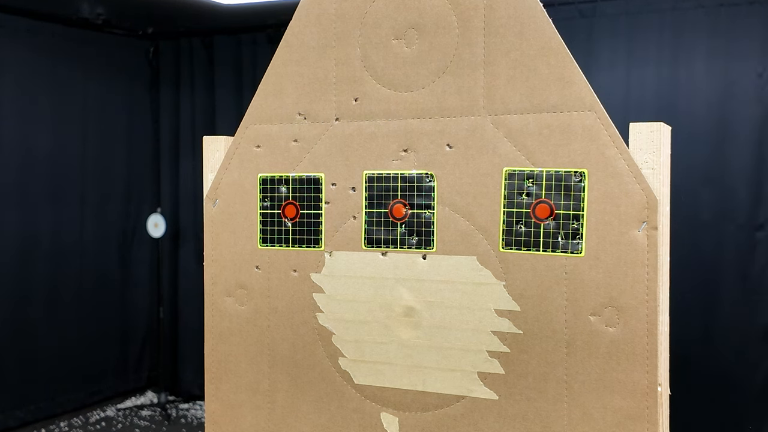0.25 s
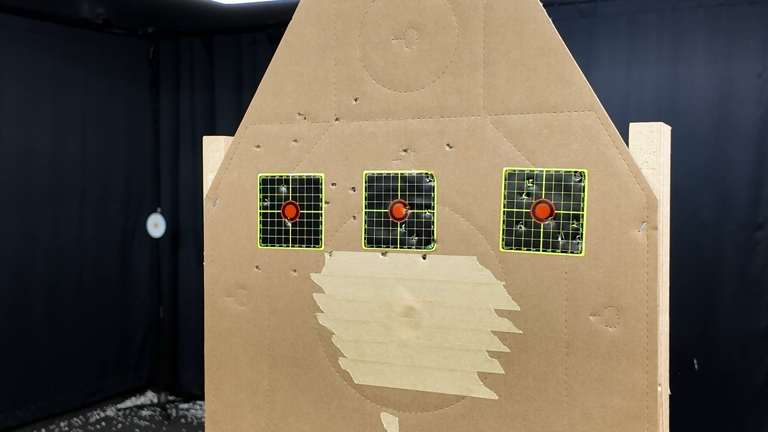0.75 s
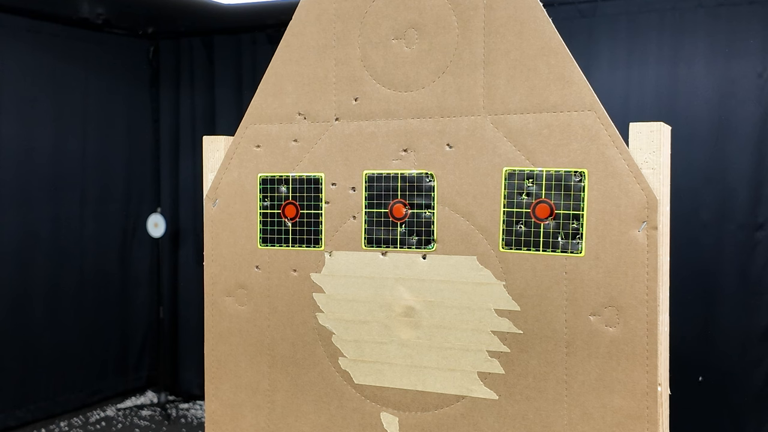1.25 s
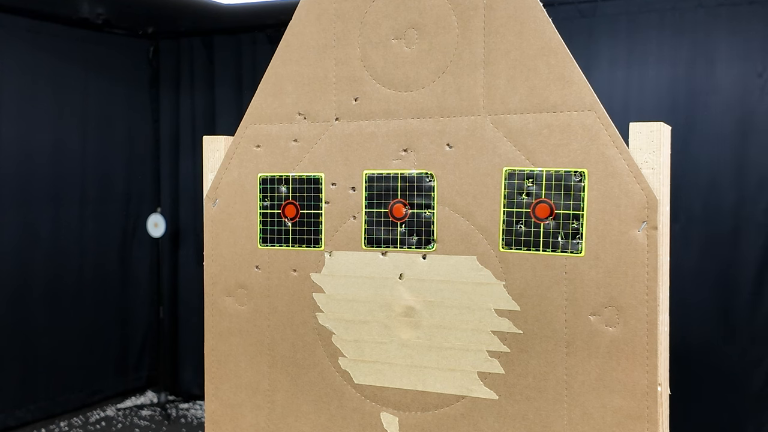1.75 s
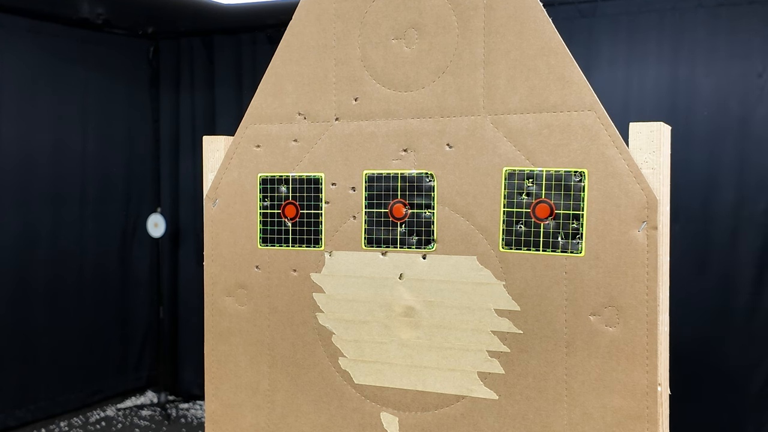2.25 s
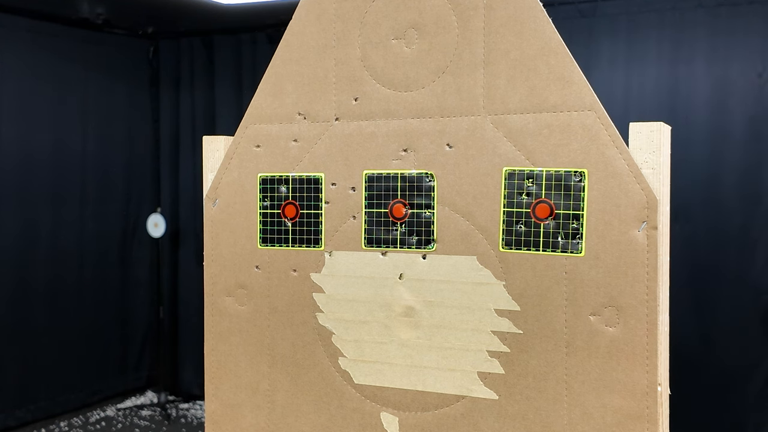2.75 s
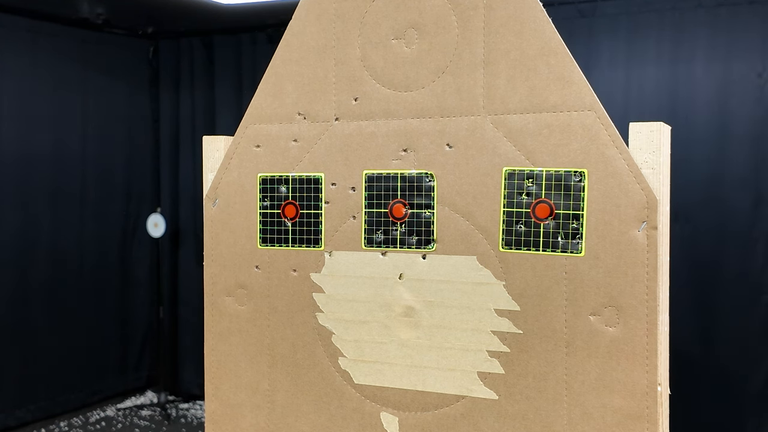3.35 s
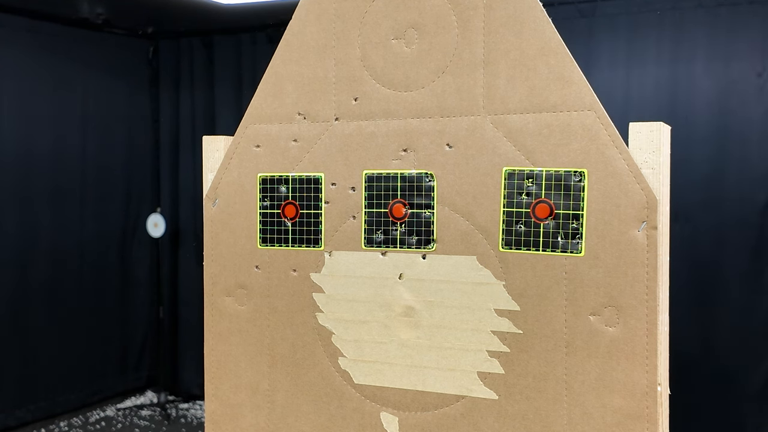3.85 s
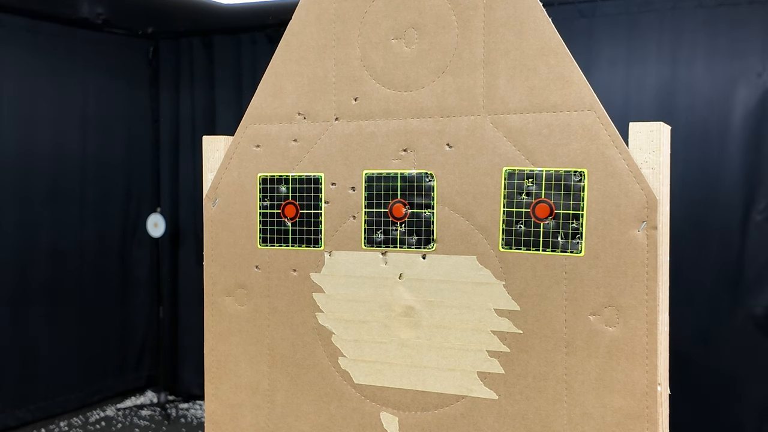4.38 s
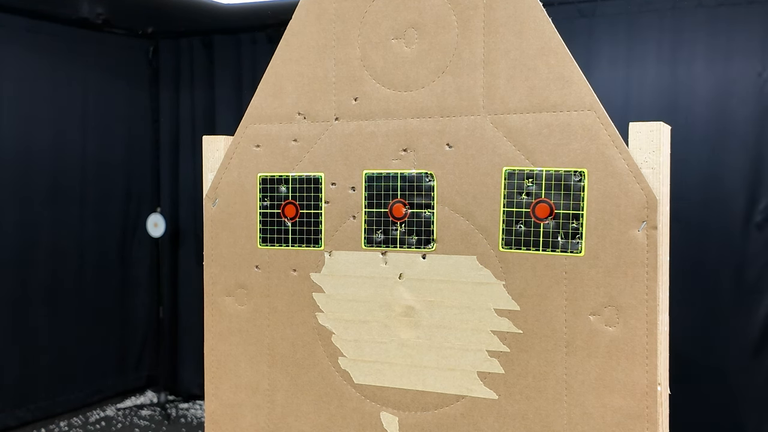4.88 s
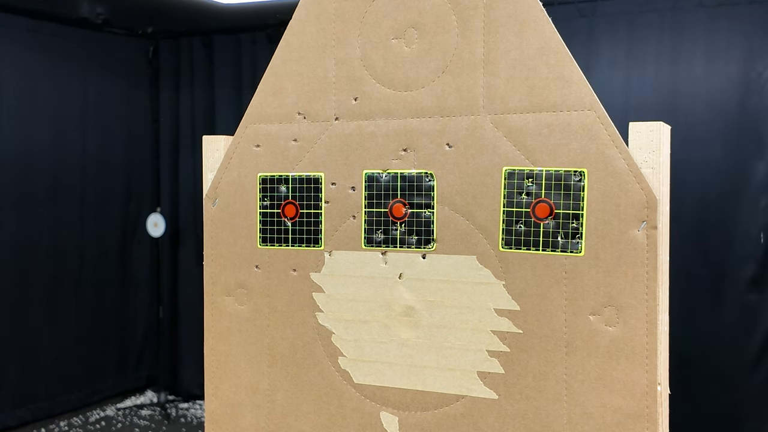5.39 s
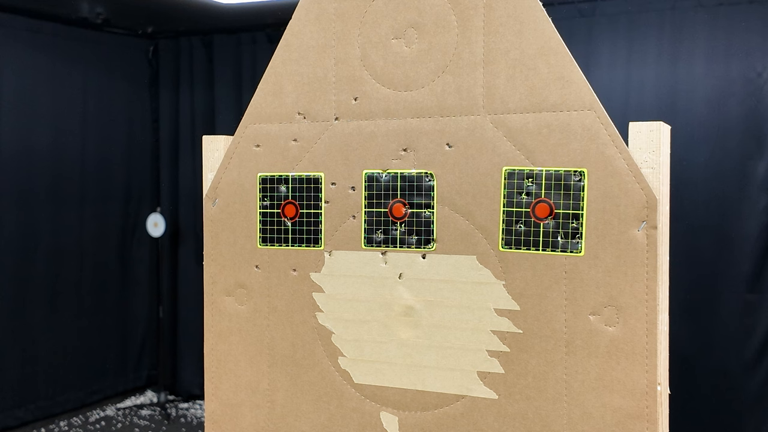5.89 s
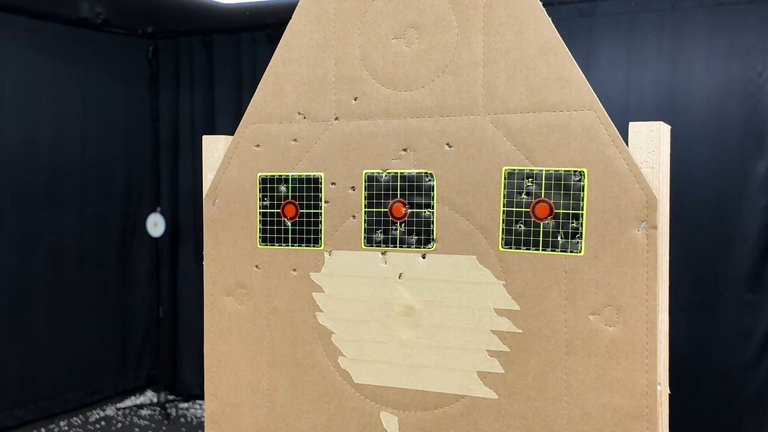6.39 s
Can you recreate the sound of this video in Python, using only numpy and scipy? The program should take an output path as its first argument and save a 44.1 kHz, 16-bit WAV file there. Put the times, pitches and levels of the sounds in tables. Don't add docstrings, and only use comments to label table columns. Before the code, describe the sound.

Right beside the microphone, a gas blowback air pistol fires six times, just under a second apart. Each shot is a sharp, overloaded crack with metallic slide clatter, then a pellet smacks cardboard a tenth of a second later. Dry trigger clicks fall between shots. After the last, the slide stays open, a catch clicks and a sleeve rustles. A small curtained room gives a short tail over low ventilation rumble.

```python
import sys
import numpy as np
from scipy import signal
from scipy.fft import rfft, irfft, next_fast_len
from scipy.io import wavfile
from scipy.ndimage import uniform_filter1d

SR = 44100
rng = np.random.default_rng(int(sys.argv[2]) if len(sys.argv) > 2 else 0)


def voltage_ratio(level):
    return 10 ** (np.asarray(level, float) / 20)


def dump(signal):
    limited = np.clip(np.atleast_2d(signal).T, -1, 1)
    pcm = np.round(limited * 32767).astype(np.int16)
    wavfile.write(sys.argv[1], SR, pcm)


N = 292383

# blast time in seconds, slide-back level in dB, time until the slide stops in ms.
SHOTS = [
    (.4440, -1, 52.2),
    (1.4028, -1, 52.7),
    (2.3134, 2, 52.6),
    (3.2039, 3, 53.2),
    (4.1411, 3, 52.6),
    (4.9793, 2, 31.2),
]
# peak in dB, rattle in ms.
TRAVEL = [(-13.5, 27), (-7.5, 2.3), (9.5, 1.4), (2.5, 2.6), (-7, 9), (-15, 4.1)]
TRAVEL_MS = [-5.0, -3.0, 1.5, 7.0, 14.5, 38]
# level in dB, rattle in ms.
SLAM = [
    (-3, 3),
    (2, 2.8),
    (-8.5, 1.8),
]
SLAM_MS = [0, 2.6, 7]
# frequency in Hz, width in Hz, level in dB.
BARREL = [(1053, 310, -1.5), (1846, 150, -4), (2330, 220, 4.5), (3130, 380, 0), (5450, 910, -14.5),
          (7770, 890, -16), (10700, 760, -20), (13300, 700, -44)]
# frequency in Hz, width in Hz, level in dB.
MUZZLE = [(430, 300, 0), (690, 300, -4), (1500, 700, -17), (2500, 700, -20), (6000, 2000, -31)]
# frequency in Hz, width in Hz, level in dB.
SLIDE = [(432, 92, -14.5), (1050, 440, -17.5), (2920, 1300, 5.5), (5160, 410, -16.5), (6900, 2500, -15.5),
         (8500, 410, -6), (11200, 4400, -25.5)]
# frequency in Hz, width in Hz, level in dB.
BREECH = [(658, 120, -8.5), (2640, 550, 5), (5000, 570, -6.5), (7060, 510, -2), (9770, 810, -8.5),
          (12300, 2600, -27)]
# start in seconds, frequency in Hz, level in dB, 60 dB decay in seconds.
SPRING = [(4.02, 2720, -64, .6), (4.02, 3750, -68, .6), (4.02, 4280, -69, .3), (4.04, 1450, -64, .6),
          (5.017, 12300, -36, .06)]

# time in seconds, peak in dB.
RESET = [(0.7951, -7), (1.8052, -10.5), (2.6509, -8), (3.5771, -9), (4.4812, -10.5)]
TAKE_UP = [0.3966, 1.3513, 2.2547, 3.109, 4.017, 4.916]
# time in seconds, peak in dB,
# frequency in Hz.
LET_OFF = [(.0402, -44, 2520), (.9198, -42.5, 2510), (1.9036, -50, 2770), (2.7766, -39.5, 2480),
           (3.695, -44, 2720), (4.598, -44, 2720)]
# time in seconds, peak in dB, tilt in dB per octave.
CATCH = [
    (5.4815, -39, -3),
    (5.5075, -17, 0),
    (5.5405, -30, -3),
    (5.582, -38, -4),
]
# frequency in Hz, width in Hz, level in dB.
SEAR = [(1897, 186, 7), (2630, 400, 0), (3465, 190, -2), (4830, 760, -9), (6840, 290, -8),
        (8800, 3000, -22), (12860, 2800, -35.5)]
# frequency in Hz, width in Hz, level in dB.
SLACK = [(1980, 250, 0), (2600, 350, -7), (3400, 700, -13), (6500, 900, -27)]
# frequency in Hz, width in Hz, level in dB.
LEVER = [(1760, 130, 3.5), (2520, 200, 2.5), (3050, 270, -5.5), (4220, 270, -6.5), (6150, 830, -16),
         (7500, 760, -17), (9300, 740, -21), (11500, 1500, -28)]

# time in seconds, face level in dB, back layer level in dB.
HITS = [(.5522, 2, 4), (1.5094, -1.5, -4), (2.4216, 3, -1.5), (3.3121, 2, 1), (4.2490, .5, -2.5),
        (5.0875, 4, -2.5)]
# time in seconds, peak in dB.
DROPS = [(1.6356, -13), (2.556, -12.5), (2.591, -25.5), (3.521, -23), (4.382, -18), (5.2614, -17)]
# frequency in Hz, width in Hz, level in dB.
CARD = [(450, 300, 0), (950, 600, -7), (2200, 1100, -17), (3600, 1800, -24), (7500, 5000, -39)]
# frequency in Hz, width in Hz, level in dB.
TEAR = [(2400, 1800, -0.5), (4200, 3400, -8), (9000, 5000, -18.5), (13500, 4000, -24.5)]

# start in seconds, end in seconds, level in dB.
STROKES = [
    (5.398, 5.848, -52),
    (5.798, 6.112, -59.5),
    (6.05, 6.29, -62.5),
    (6.24, 6.47, -59.5),
    (6.398, 6.693, -61.5),
]
# start in seconds, end in seconds, top pitch in Hz, level in dB.
SQUEALS = [(6.055, 6.27, 10720, -76), (6.31, 6.48, 10450, -79), (6.44, 6.575, 11000, -69)]
# frequency in Hz, level in dB per Hz.
CLOTH = [(710, -14), (1200, 4), (1340, -1), (3320, 0), (4410, -5.5), (5530, -6), (10300, -20),
         (16000, -38.5)]

# delay in ms, level in dB.
ECHOES = [(7.5, -27), (9.5, -16), (15.5, -28), (17, -20)]
# delay in ms, level in dB.
FAR_ECHOES = [(5.5, -2), (10.5, -5), (15, -7), (23, -7), (26, -2), (35, -20)]
# frequency in Hz, level in dB, 60 dB decay in seconds.
TAIL = [(99, -39.5, 3.2), (186, -35.5, 1.5), (400, -42.5, 0.86), (750, -42, 0.72), (1470, -39.5, 0.44),
        (2900, -39.5, 0.33), (7000, -39, 0.27), (14000, -43.5, 0.23)]
# frequency in Hz, level in dB per Hz.
AIR = [(20, -41), (45, -15.5), (155, -5.5), (280, -2), (680, -15.5), (1830, -35), (3000, -41), (16000, -65)]
# frequency in Hz, width in Hz, level in dB.
HUM = [(60.3, 7.2, -65), (120.4, 12, -48), (189, 5.3, -55.5)]


def pistol():
    return gas_blast() + slide_travel() + slide_closing() + springs()


def gas_blast():
    out = np.zeros(N)
    pop_s = .0112
    for s, _, _ in SHOTS:
        add(out, s, strike(BARREL[:2], 6, rattle_ms=.94, rough=.2, low_hz=300., soft_hz=4175.))
        add(out, s + .0046, -strike(CARD, -4.5, rattle_ms=1., rough=.093, low_hz=171.))
        add(out, s + pop_s, strike(MUZZLE, 9, rattle_ms=.6, rough=.03, low_hz=250.))
        add(out, s + pop_s - .0007, strike(BREECH, 4, rattle_ms=.4, rough=.3, low_hz=900.))
    return out


def slide_travel():
    out = np.zeros(N)
    back_ms = 18.7
    for s, back_db, _ in SHOTS:
        for ms, (db, rattle_ms) in zip(TRAVEL_MS, TRAVEL):
            add(out, s + ms / 1000, strike(BARREL, db, rattle_ms, rough=.66, low_hz=497.))
        for ms, (db, rattle_ms) in zip(SLAM_MS, SLAM):
            slam = strike(SLIDE, back_db + db, rattle_ms, rough=.42, low_hz=300.)
            add(out, s + (back_ms + ms) / 1000, slam)
        add(out, s + .038, strike(BREECH[3:], -17, rattle_ms=1.5, rough=.5, low_hz=6000.))
    return out


def slide_closing():
    out = np.zeros(N)
    *closing, locking = (s + stop_ms / 1000 for s, _, stop_ms in SHOTS)
    for s in closing:
        add(out, s, strike(BREECH, 4.5, rattle_ms=2., rough=.7, low_hz=900., tilt_db=.5))
        add(out, s + .0048, strike(BREECH, 4.5, rattle_ms=1.2, rough=.6, low_hz=1200., tilt_db=-1.5))
        add(out, s + .013, strike(BREECH, -9, rattle_ms=5.9, rough=.64, low_hz=900., tilt_db=3.))
    add(out, locking, strike(BREECH, -5.5, rattle_ms=4.6, rough=.44, low_hz=900.))
    return out


def springs():
    out = np.zeros(N)
    t = np.arange(SR // 2) / SR
    for s, hz, db, t60 in SPRING:
        add(out, s, voltage_ratio(db) * fade(t, t60) * np.sin(2 * np.pi * hz * t))
    return out


def trigger():
    out = np.zeros(N)
    for s, db in RESET:
        add(out, s, strike(SEAR, db, rattle_ms=.34, rough=.3, low_hz=1360.))
    for s in TAKE_UP:
        add(out, s, strike(SLACK, -35, rattle_ms=.68, rough=.09, low_hz=1500., soft_hz=7750.))
    for s, db, hz in LET_OFF:
        modes = [(hz, 400, 0), (1.08 * hz, 700, -9), (6700, 900, -24)]
        add(out, s, strike(modes, db, rattle_ms=.68, rough=.09, low_hz=1500., soft_hz=7500.))
    for s, db, tilt_db in CATCH:
        add(out, s, strike(LEVER, db + .5, rattle_ms=2.35, rough=.11, low_hz=1300., tilt_db=tilt_db))
    return out


def target():
    face, back = np.zeros((2, N))
    layer_s = .002
    for s, face_db, back_db in HITS:
        crack = strike(CARD, face_db, rattle_ms=.5, rough=.04, low_hz=300., soft_hz=5500., tilt_db=1.5)
        thud = strike(CARD, back_db, rattle_ms=1.2, rough=.06, low_hz=280., soft_hz=7000., tilt_db=2.5)
        add(face, s, crack)
        add(back, s + layer_s, thud)
        add(face, s, strike(TEAR, face_db - 13.5, rattle_ms=5.7, rough=.6, low_hz=1200.))
    for s, db in DROPS:
        add(back, s, strike(CARD, db, rattle_ms=2.6, rough=.18, low_hz=400., soft_hz=5070., tilt_db=-2.))
    return face, back


def sleeve():
    rub = np.zeros(N)
    for s, end, db in STROKES:
        rub += voltage_ratio(db) * speed(s, end, rise_s=.35 * (end - s), fall_s=.065)
    out = rub * voltage_ratio(.92 * wander(60)) * coloured(CLOTH)
    for s, end, top_hz, db in SQUEALS:
        slip = speed(s, end, rise_s=.065, fall_s=.065)
        lag = (1 - slip) ** 2
        jitter = 1 + .002 * wander(60) + .008 * wander(22)
        phase = 2 * np.pi * np.cumsum(top_hz * (1 - .15 * lag) * jitter) / SR
        threads = np.zeros(N)
        for ratio, thread_db in [(1, 0), (.955, -6), (1.09, -8)]:
            threads += voltage_ratio(thread_db + 4 * wander(20)) * np.sin(ratio * phase)
        out += voltage_ratio(db - 14 * lag) * (slip > 0) * threads
    return out


def echoes(x, table, soft_hz):
    paths = np.zeros(SR // 20)
    for ms, db in table:
        paths[int(ms / 1000 * SR)] = voltage_ratio(db)
    dull = signal.butter(1, soft_hz, fs=SR, output="sos")
    return signal.sosfilt(dull, signal.fftconvolve(x, paths)[:N])


def room(x, build_ms):
    size = next_fast_len(N)
    octave = np.log2(np.arange(size // 2 + 1) * SR / size + 1)
    sound, noise = rfft(x, size), rfft(rng.standard_normal(size))
    hz, db, t60 = np.transpose(TAIL)
    fill = np.exp(-1000 / SR / build_ms)
    out = np.zeros(N)
    for centre in np.arange(6.5, 14.1, 1 / 3):
        share = np.sqrt(np.clip(1 - 3 * np.abs(octave - centre), 0, 1))
        keep = fade(1 / SR, np.interp(centre, np.log2(hz), t60)) ** 2
        received = irfft(sound * share, size)[:N] ** 2
        energy = signal.lfilter([1 - fill], np.convolve([1, -keep], [1, -fill]), received)
        field = irfft(noise * share, size)[:N] * voltage_ratio(1.1 * wander(60 + 10 * centre))
        level = voltage_ratio(np.interp(centre, np.log2(hz), db))
        out += level * np.sqrt(np.abs(energy)) * field / field.std()
    lag = int(.005 * SR)
    return np.pad(out, (lag, 0))[:N]


def ventilation():
    out = voltage_ratio(-43.5 + .31 * wander(6.6)) * coloured(AIR)
    for hz, width, db in HUM:
        peak = [(hz - 4 * width, -99), (hz - width, -9), (hz, 0), (hz + width, -9), (hz + 4 * width, -99)]
        out += voltage_ratio(db) * coloured(peak)
    return out


def strike(modes, db, rattle_ms, rough, low_hz=120., soft_hz=16300., tilt_db=0.):
    t = np.arange(2048) / SR
    hz, width, gain_db = np.transpose(modes)[:, :, None]
    sign = (-1.) ** np.arange(len(hz))[:, None]
    gain = sign * voltage_ratio(gain_db + tilt_db * np.log2(hz / 2000)) * width
    ring = (gain * np.exp(-np.pi * width * t) * np.sin(2 * np.pi * hz * t)).sum(0)
    push = rough * rng.standard_normal(len(t)) * np.exp(-t * 1000 / rattle_ms)
    push[0] -= 1
    lines = rfft(push)
    push = irfft(lines / np.abs(lines) ** .8) * (t < .03)
    band = signal.butter(2, [low_hz, soft_hz], "band", fs=SR, output="sos")
    sound = signal.sosfilt(band, signal.fftconvolve(push, ring))
    return voltage_ratio(db) * sound / np.abs(sound).max()


def add(track, s, sound):
    i = int(s * SR)
    track[i:i + len(sound)] += sound[:N - i]


def fade(t, t60):
    return np.exp(-np.log(1000) * t / t60)


def speed(start, end, rise_s, fall_s):
    t = np.arange(N) / SR
    return np.clip(np.minimum((t - start) / rise_s, (end - t) / fall_s), 0, 1)


def coloured(spectrum):
    hz, db = np.transpose(spectrum)
    size = next_fast_len(N)
    bins = np.arange(size // 2 + 1) * SR / size + 1
    gain = voltage_ratio(np.interp(np.log(bins), np.log(hz), db))
    noise = irfft(rfft(rng.standard_normal(size)) * gain, size)[:N]
    return noise / noise.std()


def wander(rate):
    k = int(SR / rate)
    steps = np.repeat(rng.standard_normal(N // k + 1), k)
    walk = uniform_filter1d(uniform_filter1d(steps, k), k)[:N]
    return walk / walk.std()


def scene():
    gun, clicks, (face, back) = pistol(), trigger(), target()
    early = echoes(voltage_ratio(-14.5) * gun + clicks, ECHOES, soft_hz=9320.)
    early += echoes(back, FAR_ECHOES, soft_hz=3345.)
    late = room(voltage_ratio(-3.) * gun + voltage_ratio(-12.5) * clicks + voltage_ratio(4.5) * (face + back), build_ms=1.)
    return (gun + clicks + face + back + early + late + ventilation() + sleeve())[None]


def band_limit(x):
    return signal.sosfilt(signal.butter(12, 16520, fs=SR, output="sos"), x)


def record(dry):
    top_cut = signal.ellip(6, .3, 40, 15600, fs=SR, output="sos")
    heard = signal.sosfilt(top_cut, dry)
    heard = heard + voltage_ratio(-85) * rng.standard_normal(dry.shape)
    mix = np.clip(heard, -1, 1)
    return band_limit(mix)


dry = scene()
out = record(dry)
dump(out)
```